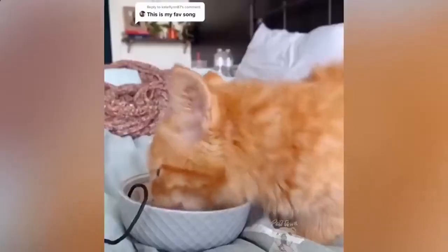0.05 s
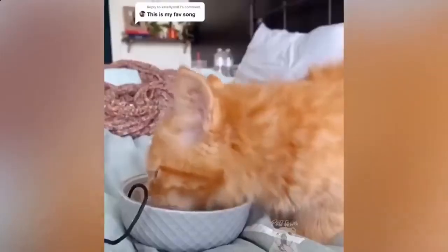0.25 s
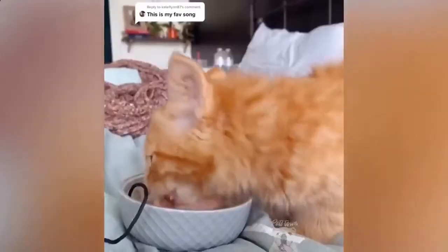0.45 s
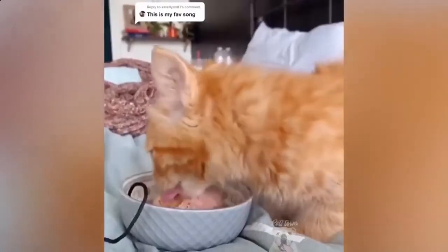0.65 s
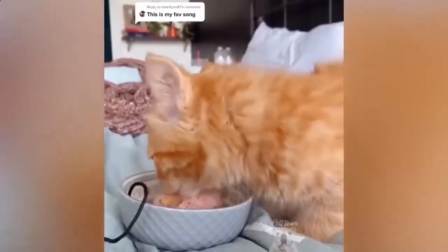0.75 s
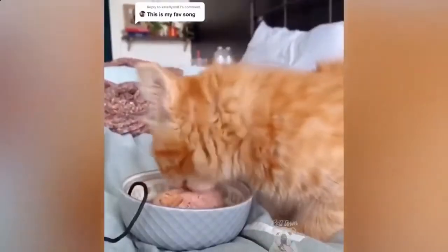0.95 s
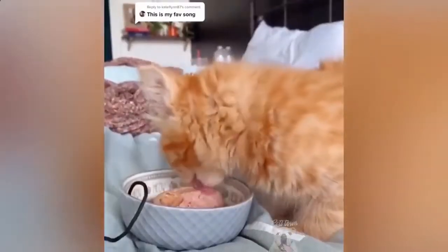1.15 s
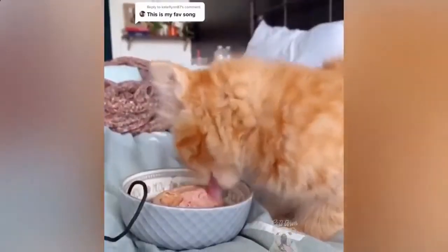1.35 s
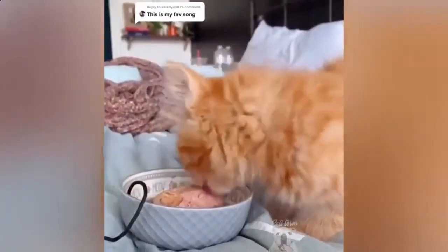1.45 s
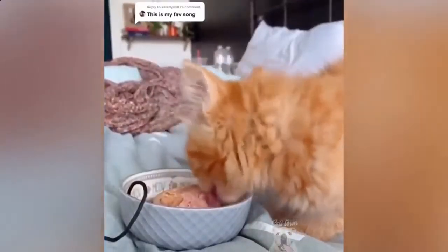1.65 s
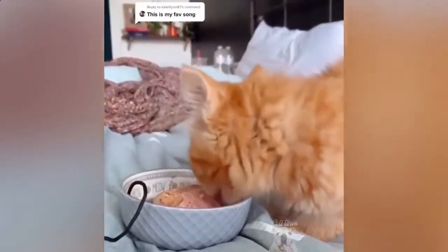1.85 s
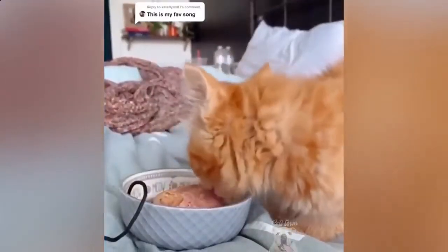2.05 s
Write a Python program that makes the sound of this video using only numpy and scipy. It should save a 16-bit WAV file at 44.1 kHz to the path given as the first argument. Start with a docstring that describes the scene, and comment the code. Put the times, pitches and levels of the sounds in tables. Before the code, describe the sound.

A kitten gives one long nasal yowl while eating, leaping up quickly then sinking in steps to a low growl; wet licks, crackling food and bowl knocks surround it, very close in a soft quiet room.

```python
"""Kitten yowling over wet food

One long, nasal call, close by, leaps up, then sinks step by step into a buzzing growl: harmonics
of the vocal folds through three resonances, plus rasping air. Lips and tongue click (pinged cavities),
bites knock on a faintly ringing bowl (damped taps, decaying modes) and food crackles (random pops).
Filtered noise makes a low rumble; a short, dull tail makes a quiet, soft room."""
import sys
import numpy as np
from scipy import signal
from scipy.fft import rfft, irfft, next_fast_len
from scipy.io import wavfile
from scipy.ndimage import uniform_filter1d, map_coordinates

SR = 44100
rng = np.random.default_rng(int(sys.argv[2]) if len(sys.argv) > 2 else 0)


def log_audio(samples):
    """Write samples as a 16-bit WAV file to the path given in sys.argv[1]."""
    # one column per channel
    frames = np.atleast_2d(samples).T
    # limit to full scale, then quantise
    limited = np.clip(frames, -1, 1)
    pcm = np.round(limited * 32767).astype(np.int16)
    wavfile.write(sys.argv[1], SR, pcm)


N = 92610

# Rumble level. Each row: time in seconds, level in dB.
RUMBLE_LEVEL = [(.02, -89), (.06, -52), (.27, -51), (1, -56), (1.25, -48.5), (1.5, -52.5), (1.68, -46),
                (1.93, -55.5), (1.99, -36.5), (2.1, -49)]
# Rumble spectrum. Each row: frequency in Hz, gain in dB.
RUMBLE_SPECTRUM = [(10, -3.5), (25, -3), (50, -13), (100, -22.5), (170, -26.5), (300, -37.5), (2000, -59)]
# Level of the chewing crackle. Each row: time in seconds, level in dB.
CRACKLE_LEVEL = [(.03, -102), (.05, -55.5), (.17, -68), (.22, -43), (.29, -63.5), (.44, -50), (.47, -41.5),
                 (.55, -56.5), (.62, -49.5), (.78, -56.5), (.95, -46.5), (1.02, -52), (1.27, -72.5),
                 (1.42, -58), (1.54, -75.5), (1.65, -51.5), (1.69, -71.5), (1.89, -61), (1.985, -69),
                 (2.04, -74)]
# Crackle spectrum. Each row: frequency in Hz, gain in dB.
CRACKLE_SPECTRUM = [(300, -26.5), (800, -2), (1600, -4), (3500, -3.5), (6000, -2.5), (10000, -11.5),
                    (13000, -19)]
# Ringing modes of the bowl. Each row: frequency in Hz, level in dB, 60 dB decay time in seconds.
BOWL_MODES = [(1362, -8, .05), (2690, 0, .18), (5510, -20, .035)]
# Bites knocking on the bowl. Each row: start in seconds, level in dB, pitch in Hz.
BITES = [(0.348, -28, 850), (0.969, -27, 490), (1.231, -15, 1082), (1.481, -10, 1210),
         (1.7362, -18.5, 1160), (1.8844, -33, 1180), (1.971, -8.5, 1300), (2.049, -42, 1063)]
# Wet clicks of lips and tongue. Each row: start in seconds, peak level in dB, cavity pitch in Hz,
# gain of the sharp treble in dB.
CLICKS = [(0.049, -37.5, 1839, -27), (0.1873, -10, 3350, -2.5), (0.1889, -15.5, 3300, 8),
          (0.1973, -37, 3800, 5), (0.3474, -28.5, 3670, -12), (0.3717, -30.5, 4000, -2),
          (0.4625, -25.5, 3700, 3), (0.6183, -33, 3600, -42), (0.623, -35.5, 3540, -3),
          (0.696, -40.5, 3700, 3.5), (0.859, -20.5, 3620, -4.5), (0.941, -21.5, 3380, 5),
          (0.948, -30, 3480, 4), (1.1111, -36.5, 4600, -32), (1.1506, -16.5, 2970, -48),
          (1.201, -33, 8807, -21), (1.409, -21.5, 3360, -44), (1.4211, -19, 3900, -51.5),
          (1.4596, -30.5, 5550, -36.5), (1.6574, -33, 2003, 0.5), (1.7105, -14, 5500, 2),
          (1.864, -35.5, 3800, 7.5), (1.9664, -4.5, 6510, 47), (2.0872, -34.5, 4000, 1),
          (2.0988, -33, 4100, -11.5)]
# Pitch of the call. Each row: time in seconds, fundamental in Hz.
CALL_PITCH = [(0.193, 324.0), (0.22, 336.4), (0.252, 407), (0.282, 518.0), (0.317, 599), (0.338, 698),
              (0.345, 842.5), (0.382, 886), (0.41, 1005.0), (0.436, 1044), (0.451, 1020), (0.463, 929),
              (0.473, 744), (0.513, 686), (0.523, 633.6), (0.577, 597.7), (0.608, 631.0), (0.677, 674),
              (0.708, 608), (0.729, 548.4), (0.786, 518), (0.873, 548), (0.91, 529.5), (0.974, 476.2),
              (1.031, 463.7), (1.14, 471.7), (1.214, 444.6), (1.249, 377.8), (1.308, 345.9), (1.362, 358.4),
              (1.392, 382.1), (1.429, 360.1), (1.467, 349.6), (1.51, 254.0), (1.526, 270.7), (1.535, 256.0),
              (1.565, 281.8), (1.585, 244.1), (1.606, 232.6), (1.623, 271.5), (1.645, 237.6)]
# Loudness of the call. Each row: time in seconds, level in dB.
CALL_LEVEL = [(0.206, -24.5), (0.219, -21), (0.259, -25.5), (0.326, -30), (0.342, -25), (0.413, -29),
              (0.44, -28.5), (0.466, -20.5), (0.482, -26), (0.523, -28), (0.566, -23.5), (0.584, -25.1),
              (0.7, -26), (0.75, -24), (0.802, -17.5), (0.835, -24), (0.899, -22), (1.031, -15.5),
              (1.092, -17.5), (1.242, -11), (1.278, -16.3), (1.309, -14.5), (1.349, -17.5), (1.391, -15.5),
              (1.42, -18), (1.465, -11.8), (1.526, -19.1), (1.554, -17), (1.595, -21), (1.636, -20.5)]
# Shape of the mouth and press of the throat. Each row: time in seconds, first resonance in Hz,
# second resonance in Hz, brightness in dB per octave, treble gain in dB.
MOUTH_SHAPE = [(0.2, 960, 1760.0, -2.5, 11), (0.226, 985, 1906.0, 3.7, 6), (0.256, 863.0, 1697.0, 4, -2),
               (0.293, 975, 1851.0, 6.6, -20.8), (0.344, 816, 1640.0, -8, -1.5),
               (0.432, 820, 1449.0, -5.5, 11), (0.488, 896.0, 1688.0, 4.5, 11.5),
               (0.531, 936, 1677.0, 4.5, -4), (0.576, 952.0, 1822.0, 2.5, -17),
               (0.605, 743.0, 1492.0, 2.3, -5.5), (0.707, 867, 1540.0, -1.5, -12),
               (0.739, 1060, 1745.0, 1, 6.5), (0.785, 878.0, 1871.0, 11.5, -41),
               (0.87, 917, 1750.0, 3, -26.5), (0.946, 930.5, 1440.0, 2, -14),
               (1.063, 848, 1499.0, 5, -15.5), (1.119, 855, 1358.0, 3.5, -10), (1.203, 885, 1461.0, 3, -8),
               (1.245, 795, 1496.0, 2, -6.5), (1.294, 830, 1577.0, 3, -6.5), (1.39, 795, 1550.0, 4.5, -19),
               (1.412, 812, 1560.0, 6.5, -10), (1.493, 802.6, 1650.0, 1.7, -6.5),
               (1.558, 951.0, 1709.0, -0.5, -13.5), (1.596, 805.4, 1647.0, 0.4, -16.5),
               (1.638, 914, 1622.0, 0.5, -25)]
# Hoarseness. Each row: time in seconds, roughness from 0 to 1.
ROUGHNESS = [(.2, .5), (.23, .7), (.27, .5), (.34, .33), (.42, .05), (.49, .62), (.56, .28), (.65, .15),
             (.85, .06), (1.18, .09), (1.25, .29), (1.44, .26), (1.52, .19), (1.64, .26)]
# Spectrum of the vocal folds. Each row: frequency in Hz, gain in dB.
FOLD_SPECTRUM = [(250, -2.5), (500, -6.5), (1000, -23.5), (2000, -22), (2600, -20.5), (3500, -22.5),
                 (4300, -8.5), (6000, -3)]
# Spectrum of air rasping in the throat. Each row: frequency in Hz, gain in dB.
RASP_SPECTRUM = [(200, -44), (500, -23.5), (800, 15.5), (1200, 2.5), (1750, 10), (2600, -16.5),
                 (4500, -30.5), (10000, -53.5)]
# Spectrum of the hiss that follows the treble. Each row: frequency in Hz, gain in dB.
HISS_SPECTRUM = [(900, -25.5), (2400, -4), (4200, -11), (6500, -43.5)]

ROOM_DB, ROOM_T60_S, ROOM_TOP_HZ = -28.5, 0.24, 5000
BAND_LIMIT_HZ = 13200

CRACKLE_PER_S, CRACKLE_SPREAD_DB = 4500, 12.5
MUFFLE_HZ = 4600  # corner of the duller crackle during the call

KNOCK_Q, KNOCK_TOP_HZ = 2.67, 3300
THUD_DB, THUD_S = -14.5, 0.00037
RATTLE_DB, RATTLE_S = -5, 0.0041
RING_DB, RING_DB_PER_DB = -31.5, 1.4  # ring grows faster than the bite

CLICK_Q, EDGE_HZ, EDGE_Q = 3, 8500, 1.3
SPIT_DB, SPIT_DB_PER_DB, SPIT_S = -31, .55, .003  # softer clicks have a larger share of spray
CLICK_RING_DB = -39.5

CALL_START_S, CALL_END_S, ATTACK_S, RELEASE_S = 0.197, 1.648, 0.0077, 0.016
PITCH_SMOOTH_S = .005
FIRST_WIDTH_HZ, SECOND_WIDTH_HZ, THIRD_HZ, THIRD_WIDTH_HZ = 130, 193, 2932, 350
TREBLE_FROM_HZ, TREBLE_RAMP_HZ = 1938, 442
JITTER, JITTER_HZ = 0.011, 260  # fraction of pitch at roughness 1, knots per second
SHIMMER_DB, SHIMMER_HZ = 1.15, 400  # first harmonic at roughness 1
FLUTTER_DB, FLUTTER_HZ = 1.2, 35.017
SNAP_HARMONIC = 1.5  # folds open slowly and snap shut: higher harmonics come from the snap
RASP_DB, HISS_DB = -14.5, -26.5


def amp(db):
    """Decibels to gain."""
    return 10 ** (np.asarray(db) / 20)


def unit(x):
    """Scale to rms 1."""
    return x / np.sqrt(np.mean(x ** 2) + 1e-20)


def along(points, hz):
    """Read (Hz, value) points on a log-frequency axis."""
    f, v = np.transpose(points)
    return np.interp(np.log(hz + 1), np.log(f + 1), v)


def curves(rows):
    """One value per sample for each column after the time."""
    s, *cols = np.transpose(rows)
    return [np.interp(np.arange(N) / SR, s, c) for c in cols]


def wobble(rate):
    """Smooth random curve, rate knots a second."""
    knots = rng.standard_normal(N // 8)
    return map_coordinates(knots, [np.arange(N) * rate / SR], mode="mirror")


def filtered(x, response):
    """x times a response of frequency."""
    m = next_fast_len(N + SR // 2)
    return irfft(rfft(x, m) * response(np.fft.rfftfreq(m, 1 / SR)), m)[..., :N]


def coloured(x, spectrum):
    """x shaped by a spectrum, at rms 1."""
    return unit(filtered(x, lambda hz: amp(along(spectrum, hz))))


def passed(x, hz, kind, order):
    """Causal low-pass or high-pass."""
    sos = signal.butter(order, min(hz, SR / 2 - 1), kind, fs=SR, output="sos")
    return signal.sosfilt(sos, x)


def add(track, s, sound):
    """Mix a sound in at time s, in place."""
    part = track[max(round(s * SR), 0):][:len(sound)]
    part += sound[:len(part)]


def rumble():
    """Low, uneven rumble: noise with a falling spectrum and a moving level."""
    level_db, = curves(RUMBLE_LEVEL)
    return amp(level_db) * coloured(rng.standard_normal(N), RUMBLE_SPECTRUM)


def room(x):
    """Short, dull answer of a soft room: exponentially decaying noise, low-passed."""
    t = np.arange(SR // 3) / SR
    tail = rng.standard_normal(len(t)) * amp(-60 * t / ROOM_T60_S)
    answer = signal.fftconvolve(x, tail / np.linalg.norm(tail))[:N]
    return amp(ROOM_DB) * passed(answer, ROOM_TOP_HZ, "low", order=1)


def crackle():
    """Tiny bubbles of random size burst in the food, duller during the call."""
    level_db, = curves(CRACKLE_LEVEL)
    t = np.arange(N) / SR
    bursts = (rng.random(N) < CRACKLE_PER_S / SR) * rng.choice([-1, 1], N)
    size_db = CRACKLE_SPREAD_DB * np.clip(rng.standard_normal(N), -2, 2)
    bright = coloured(bursts * amp(size_db), CRACKLE_SPECTRUM)
    dull = filtered(bright, lambda hz: 1 / (1 + (hz / MUFFLE_HZ) ** 6))
    in_call = (t > CALL_START_S) & (t < CALL_END_S)
    calling = uniform_filter1d(in_call * 1., size=SR // 10)
    return amp(level_db) * (calling * dull + (1 - calling) * bright)


def ping(t, hz, q):
    """Struck, quickly damped cavity."""
    return np.sin(2 * np.pi * hz * t) * np.exp(-np.pi * hz * t / q)


def bowl(t, modes):
    """Faint ring of the bowl: decaying sine modes, each level varied at random."""
    ring = 0
    for hz, db, t60_s in modes:
        decay = amp(db + rng.normal(0, 1) - 60 * t / t60_s)
        ring = ring + decay * np.sin(2 * np.pi * hz * t)
    return ring


def knocks():
    """The jaw closes: a dull tap, a soft thud and a short rattle; harder bites ring the bowl more."""
    out, t = np.zeros(N), np.arange(SR // 5) / SR
    for s, db, hz in BITES:
        tap = ping(t, hz, KNOCK_Q)
        thud = t / THUD_S * np.exp(1 - t / THUD_S)
        rattle = passed(rng.standard_normal(len(t)), hz, "high", order=2) * np.exp(-t / RATTLE_S)
        blow = tap + amp(THUD_DB) * thud + amp(RATTLE_DB) * rattle
        blow = passed(blow, KNOCK_TOP_HZ, "low", order=6)
        ring = amp(RING_DB + RING_DB_PER_DB * db) * bowl(t, BOWL_MODES)
        add(out, s, ring - amp(db) * blow)
    return out


def smacks():
    """A wet film snaps, pings the mouth and sprays spit; only the bowl's top mode answers."""
    out, t = np.zeros(N), np.arange(SR // 10) / SR
    for s, db, hz, treble_db in CLICKS:
        spit = rng.standard_normal(len(t)) * np.exp(-t / SPIT_S)
        snap = amp(SPIT_DB - SPIT_DB_PER_DB * db) * spit
        snap[0] = 1
        cavity = passed(ping(t, hz, CLICK_Q), 1.3 * hz, "low", order=4)
        edge = passed(ping(t, EDGE_HZ, EDGE_Q), EDGE_HZ / 2, "high", order=2)
        click = signal.fftconvolve(snap, cavity + amp(treble_db) * edge)[:len(t)]
        click = passed(click, 0.38 * hz, "high", order=3)
        ring = amp(CLICK_RING_DB) * bowl(t, BOWL_MODES[-1:])
        add(out, s, amp(db) * (click / abs(click).max() + ring))
    return out


def resonance(hz, centre_hz, width_hz):
    """Complex gain of one resonance of the throat and mouth."""
    return 1 / (1 - (hz / centre_hz) ** 2 + 1j * hz * width_hz / centre_hz ** 2)


def yowl(count=20):
    """Harmonics of the vocal folds pass three mouth resonances; air rasps once per cycle."""
    t = np.arange(N) / SR
    (pitch_hz,), (level_db,), (rough,) = curves(CALL_PITCH), curves(CALL_LEVEL), curves(ROUGHNESS)
    first_hz, second_hz, bright_db, treble_db = curves(MOUTH_SHAPE)
    pitch_hz = uniform_filter1d(pitch_hz, size=round(PITCH_SMOOTH_S * SR))
    pitch_hz = pitch_hz * (1 + JITTER * rough * wobble(JITTER_HZ))
    phase = 2 * np.pi * np.cumsum(pitch_hz) / SR

    k = np.arange(1, count + 1)[:, None]
    hz = k * pitch_hz
    flutter_db = FLUTTER_DB * np.array([wobble(FLUTTER_HZ) for _ in k])
    treble = np.clip((hz - TREBLE_FROM_HZ) / TREBLE_RAMP_HZ, 0, 1)
    gain_db = along(FOLD_SPECTRUM, hz) + bright_db * np.log2(k) + treble_db * treble + flutter_db
    gain = amp(gain_db) * resonance(hz, first_hz, FIRST_WIDTH_HZ)
    gain = gain * resonance(hz, second_hz, SECOND_WIDTH_HZ)
    gain = gain * resonance(hz, THIRD_HZ, THIRD_WIDTH_HZ)
    gain /= np.sqrt(np.sum(abs(gain) ** 2, axis=0) / 2)  # rms 1: the level curve sets loudness

    # uneven closing shakes the overtones most
    shimmer = amp(SHIMMER_DB * rough * wobble(SHIMMER_HZ) * np.sqrt(k))
    snap_phase = np.arctan(k / SNAP_HARMONIC)
    tone = np.sum(gain * shimmer * np.exp(1j * (k * phase + snap_phase)), axis=0).real

    puffs = 1 + np.cos(phase)
    rasp = coloured(rng.standard_normal(N) * puffs, RASP_SPECTRUM)
    hiss = coloured(rng.standard_normal(N) * puffs, HISS_SPECTRUM)
    air = amp(RASP_DB) * rasp + rough * amp(HISS_DB + treble_db) * hiss

    attack = np.clip((t - CALL_START_S) / ATTACK_S, 0, 1)
    release = np.clip((CALL_END_S - t) / RELEASE_S, 0, 1)
    return attack * release * amp(level_db) * (tone + rough * air)


def scene():
    """The kitten at its bowl, close by, in the room over the rumble."""
    kitten = yowl() + smacks() + knocks() + crackle()
    return (kitten + room(kitten) + rumble())[None]


def record(dry):
    """Steep band limit at the top of the treble."""
    return filtered(dry, lambda hz: 1 / (1 + (hz / BAND_LIMIT_HZ) ** 60))


dry = scene()
out = record(dry)
log_audio(out)
```